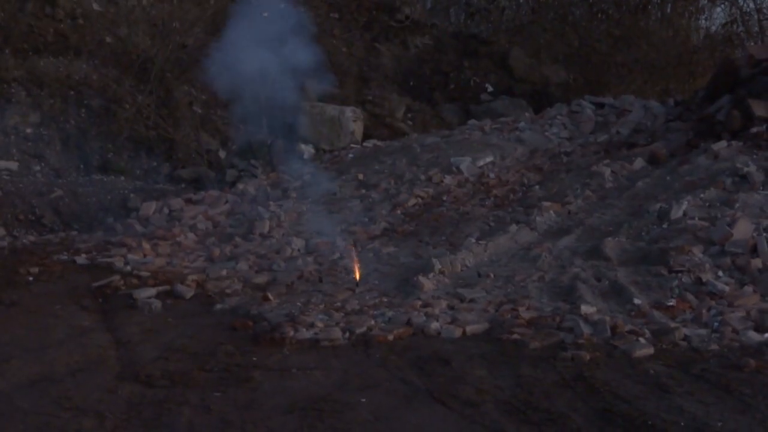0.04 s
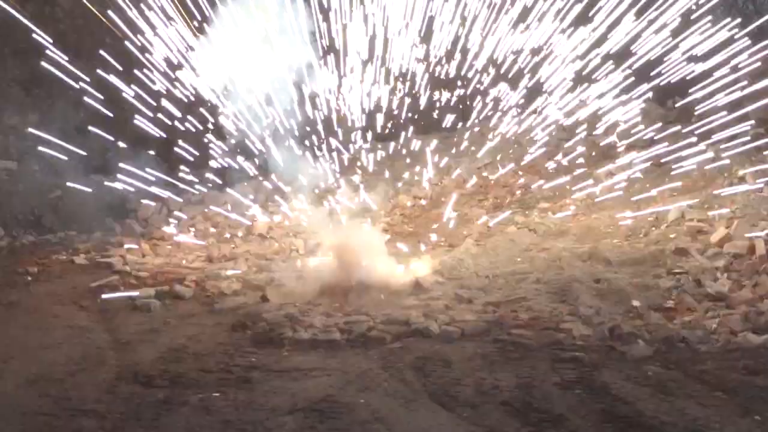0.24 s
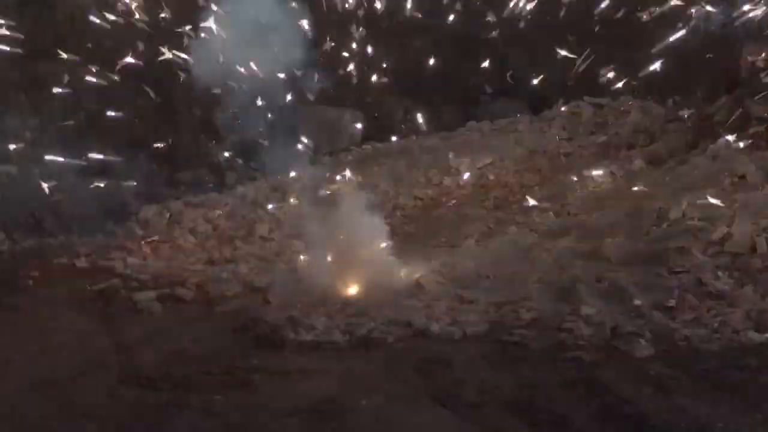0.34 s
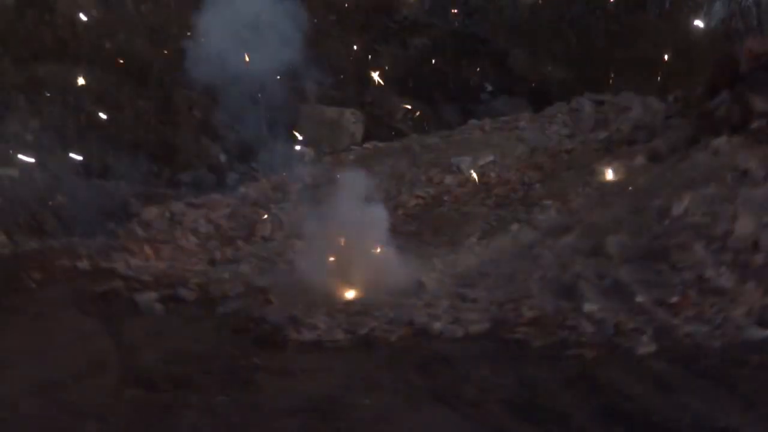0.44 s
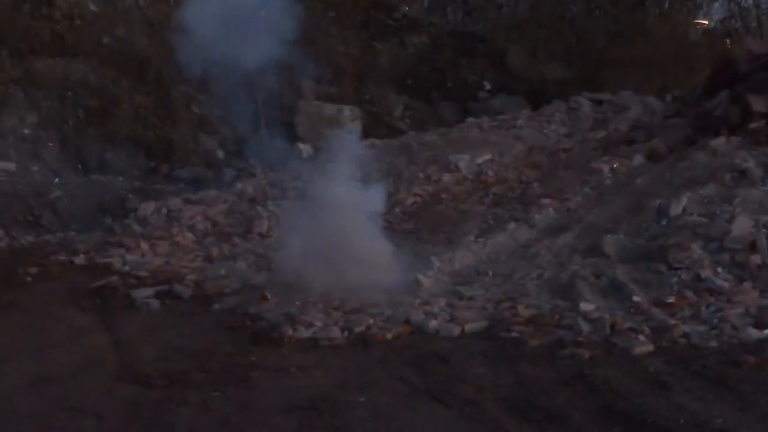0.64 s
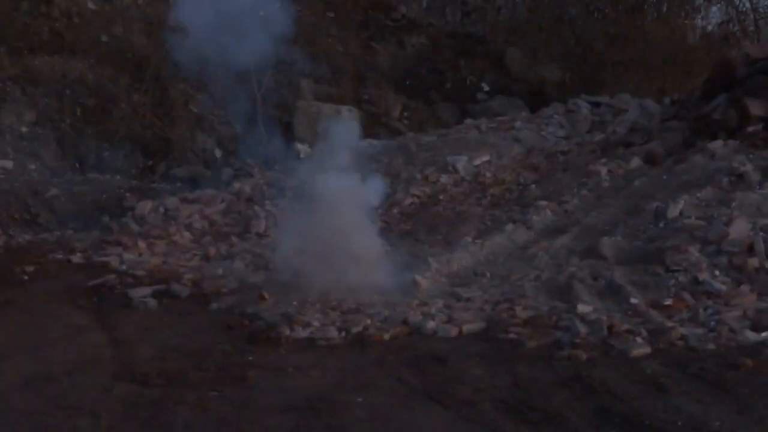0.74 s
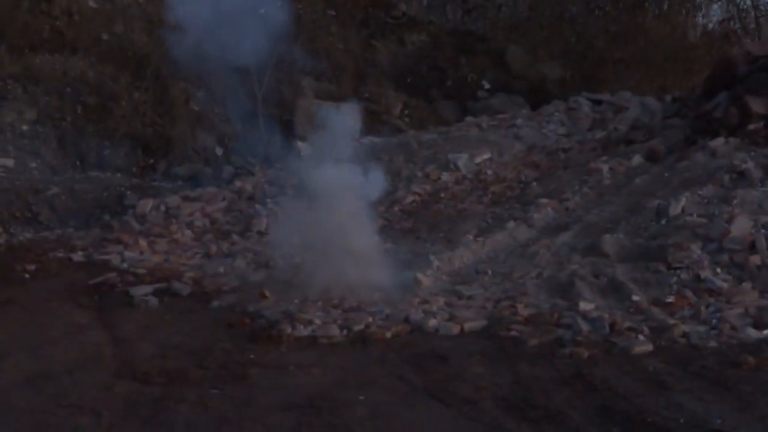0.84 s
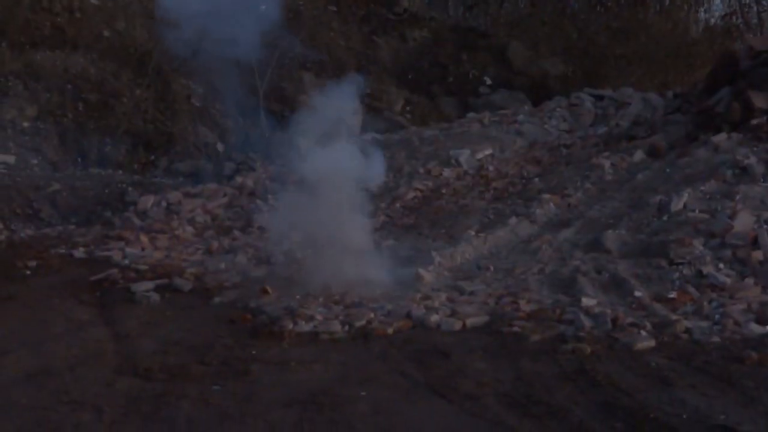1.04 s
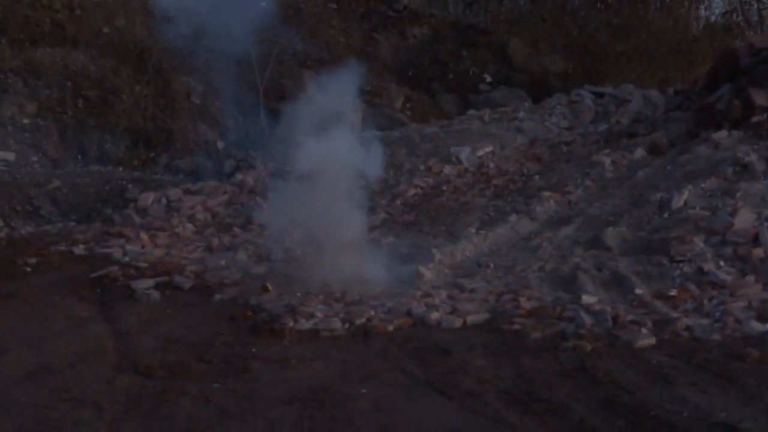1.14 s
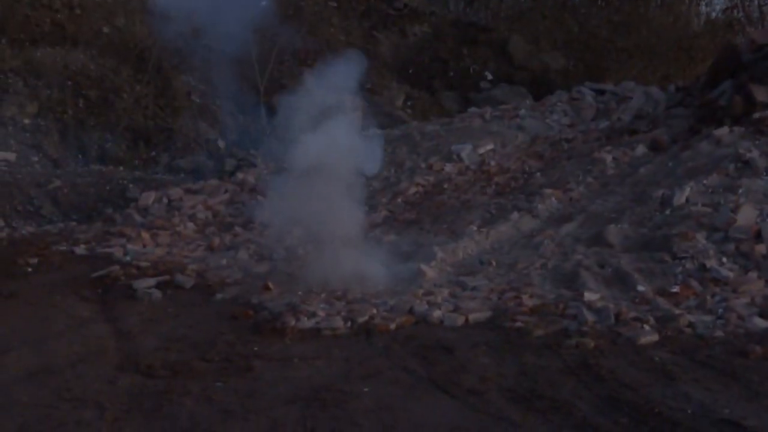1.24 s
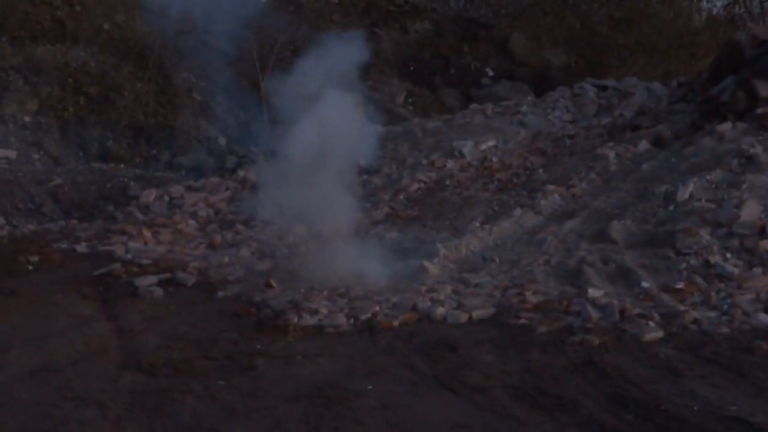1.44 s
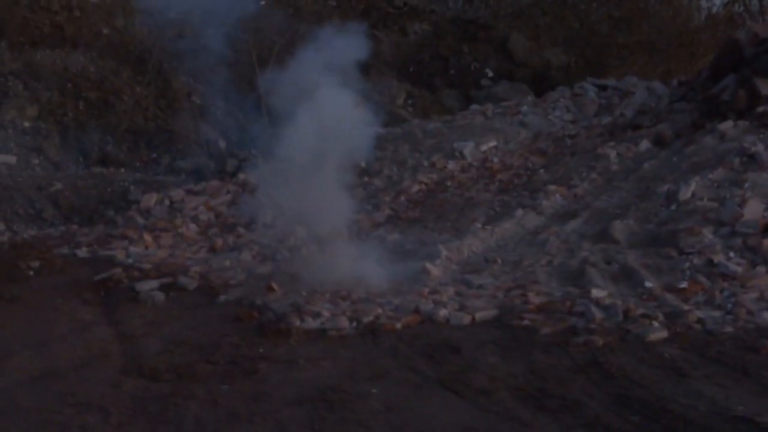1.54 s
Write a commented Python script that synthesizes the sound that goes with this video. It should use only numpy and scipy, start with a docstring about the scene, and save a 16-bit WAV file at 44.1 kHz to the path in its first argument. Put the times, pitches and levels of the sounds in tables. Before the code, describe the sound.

Brief thin fuse hiss, then a single hard firework blast distorting the microphone outdoors; bright hiss and dense hillside echoes follow, dry spark clicks snap nearby, and the darkening roll dies to faint background air.

```python
"""A fuse hisses, then one overloading bang: a firework on a heap of rubble, as overlapping noise cracks and hiss.
Rubble slopes and far hillsides send it back as a darkening roll of coloured noise, with single slaps
and low pushes made of short wavelets. Thrown sparks crackle near the microphone as filtered clicks.
Outdoor murmur and microphone hiss, both steady coloured noise, lie under it all."""
import sys
import numpy as np
from scipy import signal
from scipy.fft import rfft, irfft, next_fast_len
from scipy.io import wavfile
from scipy.ndimage import map_coordinates

SR = 44100
rng = np.random.default_rng(int(sys.argv[2]) if len(sys.argv) > 2 else 0)


def store_wav(level_fs):
    """Save 16-bit WAV to argv[1]."""
    pcm = np.round(np.clip(np.atleast_2d(level_fs), -1, 1) * 32767)
    wavfile.write(sys.argv[1], SR, pcm.T.astype(np.int16))


N = 70560
BANG_S = .2283


def amp(db):
    """dB to gain."""
    return 10 ** (np.asarray(db) / 20)


def unit(x):
    """Scale to rms 1."""
    return x / np.sqrt(np.mean(x ** 2) + 1e-20)


def along(points, hz):
    """Interpolate (Hz, value) points on a log axis; the first and last values hold beyond their frequencies."""
    point_hz, value = np.transpose(points)
    return np.interp(np.log(hz + 1), np.log(point_hz + 1), value)


def curves(rows):
    """One value per sample for each column after the time."""
    s, *columns = np.transpose(rows)
    return [np.interp(np.arange(N) / SR, s, column) for column in columns]


def wobble(knots_per_s):
    """A smooth random curve through normally distributed knots."""
    knots = rng.standard_normal(int(N * knots_per_s / SR) + 4)
    return map_coordinates(knots, [np.arange(N) * knots_per_s / SR])


def filtered(x, response):
    """Multiply the spectrum of x by a response of frequency."""
    size = next_fast_len(N + SR // 2)
    hz = np.fft.rfftfreq(size, 1 / SR)
    return irfft(rfft(x, size) * response(hz), size)[..., :N]


def rush(spectrum):
    """Stereo noise of rms 1; the mid-to-side balance sets how alike the channels are in each band."""
    # left-right correlation: freq_hz, likeness (0 to 1)
    likeness = [(60, 0.98), (180, 0.99), (550, 0.94), (1650, 0.88), (4970, 0.95), (15000, 1)]

    def mid_side_gains(hz):
        turn_rad = np.arccos(np.clip(along(likeness, hz), -1, 1)) / 2
        return amp(along(spectrum, hz)) * [np.cos(turn_rad), np.sin(turn_rad)]

    mid, side = filtered(rng.standard_normal((2, N)), mid_side_gains)
    return unit(np.array([mid + side, mid - side]))


def travelled(spectrum):
    """Noise whose bands fade with travel time in air, the treble fastest."""
    # change of colour with travel: freq_hz, loss_db_per_s
    air_loss = [(60, 16), (400, -2), (1500, 0.5), (3000, 9), (6000, 28), (14000, 72.5)]
    given_colour_at_s = .5
    hz, t_s, bins = signal.stft(rush(spectrum), SR, nperseg=1024)
    loss_db = along(air_loss, hz)[:, None] * (t_s - given_colour_at_s)
    return signal.istft(bins * amp(-loss_db), SR, nperseg=1024)[1][:, :N]


def add(out, s, sound, pan_db=0):
    """Place a sound at a time, with its left-over-right level."""
    part = out[:, round(s * SR):][:, :len(sound)]
    part += amp([[pan_db / 2], [-pan_db / 2]]) * sound[:part.shape[1]]


def wavelet(hz, cycles):
    """A short swing that rises fast and dies in a few cycles; the envelope peaks after the given cycles."""
    u = np.arange(SR // 10) / SR * hz / cycles
    return u * np.exp(1 - u) * np.sin(2 * np.pi * cycles * u)


def after_bang():
    return np.arange(N) / SR > BANG_S


def blast():
    """Cracks are noise bursts dying 60 dB in 3.9 ms; the overloaded blast adds bright hiss, held, then fading."""
    # three overlapping cracks of the bang: start_s, level_db (gain on unit noise at onset)
    cracks = [(0.2278, -1.5), (0.2322, 2.5), (0.2312, -2.5)]
    # bright hiss of the overloaded blast: time_s, level_db (relative)
    blast_hiss = [(.228, -12), (.236, -20), (.3, -17), (.37, -15.5), (.41, -17.5), (.47, -33), (.55, -31),
                  (.65, -35.5), (.77, -50), (.9, -58)]
    # blast hiss spectrum: freq_hz, density_db_per_hz (relative)
    blast_hiss_colour = [(1180, -34), (2000, -9), (2670, 9), (6150, 0), (6720, -1), (12400, -6),
                         (15500, -23.5), (16300, -43)]
    level_db, = curves(blast_hiss)
    out = travelled(blast_hiss_colour) * amp(level_db - 5.5 + 2.2 * wobble(300)) * after_bang()
    t_s = np.arange(SR // 100) / SR
    for s, db in cracks:
        add(out, s, amp(db - 60 * t_s / 0.0039) * rng.standard_normal(len(t_s)))
    return out


def roll():
    """Overlapping echoes as low noise, under finer scatter off loose stones and trees."""
    # roll of echoes: time_s, level_db (relative), left_over_right_db
    echoes = [(.232, -7.5, 1.5), (.276, -12, 2), (.39, -15.5, -2), (.488, -11, -3), (.5, -20, -3),
              (.534, -13, 1), (.56, -19.5, 1), (.67, -20, .5), (.7, -26, .5), (.735, -27, 2),
              (.75, -30, 0.5), (.797, -29.5, 3), (.802, -22.5, 1), (.85, -22, 2), (.865, -23.5, 1.5),
              (.934, -30.5, 2), (1.03, -33, 0.5), (1.1, -37, 0.5), (1.25, -41, 0.5), (1.4, -45.5, 0),
              (1.59, -44, -1)]
    # roll spectrum: freq_hz, density_db_per_hz (relative)
    echo_colour = [(15, -63), (25, -25), (205, -5), (461, -1.5), (702, -7.5), (790, -7.5), (934, -9.5),
                   (1400, -16.5), (1820, -46), (3080, -120)]
    # finer scatter: time_s, level_db (relative)
    scatter = [(.232, -22), (.314, -16), (.4, -16.5), (.488, -17.5), (.55, -22.5), (.708, -31.5),
               (.796, -38), (.802, -29.5), (.9, -35), (1.05, -43), (1.268, -51), (1.59, -57.5)]
    # scatter spectrum: freq_hz, density_db_per_hz (relative)
    scatter_colour = [(530, -31.5), (900, -3.5), (1320, -2), (1720, -2.5), (1880, -3.5), (4680, -12),
                      (12100, -33), (16000, -50.5)]
    level_db, pan_db = curves(echoes)
    fine_db, = curves(scatter)
    # flat floors: above 2200 Hz in the low part, below 600 Hz in the fine part
    low = travelled(list(echo_colour) + [(2200, -43)]) * amp(level_db + 1.2 * wobble(90))
    fine = travelled([(600, -36.5)] + list(scatter_colour)) * amp(fine_db + 1.5 + 0.5 * wobble(150))
    return (low + fine) * amp(np.outer([.5, -.5], pan_db)) * after_bang()


def slaps():
    """Rock faces return single dull copies of the bang as wavelets, with low pushes under them."""
    # slaps from rock faces: start_s, level_db (relative), left_over_right_db, pitch_hz
    faces = [(0.229, 3, -0.5, 409), (0.237, -9, 5.5, 415), (0.251, -7.5, 3, 414), (0.265, -2.5, -5.5, 410),
             (0.342, -1, -6.5, 530), (0.421, -1, -8, 410), (0.444, -4, 3, 226), (0.459, -0.5, 1, 315),
             (0.473, -11, -19, 396), (0.482, 3, -3, 395), (0.503, -2.5, -2.5, 221),
             (0.521, -6.5, -7.5, 460), (0.534, -1.5, 2, 207), (0.588, -10, 4.5, 355),
             (0.609, -5.5, -3.5, 345), (0.631, -5, 2.5, 330), (0.656, -2, 2, 453), (0.669, -7, 2, 316),
             (0.723, -5.5, 1, 387), (0.8, -7.5, 0, 625), (0.825, -5.5, 4, 580), (0.861, -8.5, -1, 443),
             (0.874, -9, 0, 370), (0.889, -9.5, 1.5, 535), (0.911, -17.5, 0, 493), (1.019, -30, 0.5, 436),
             (1.32, -28.5, 0.5, 422.5), (1.468, -24, 1.5, 390), (1.564, -28.5, 7.5, 405)]
    # low pushes: start_s, level_db (relative), pitch_hz
    thumps = [(.232, -9, 140), (0.284, -25, 93), (0.328, -15, 110), (.44, -38, 85.5), (0.577, -23.5, 85),
              (0.667, -23.5, 102), (0.801, -19.5, 102), (0.832, -26, 75), (0.909, -32, 76.5),
              (1.024, -40.5, 69.5)]
    out = np.zeros((2, N))
    for s, db, pan_db, hz in faces:
        add(out, s, amp(db - 5.05) * wavelet(hz, cycles=.85), pan_db)
    for s, db, hz in thumps:
        add(out, s, amp(db + 1.5) * wavelet(hz, cycles=0.53))
    return out


def small_sparks():
    """Fainter snaps at random times, growing weaker: start_s, level_db, bounce_ms, bounce_db."""
    from_s, to_s = .5, 1.08
    lowest_start_db, fade_db_per_s = -33.5, 29.5
    rows = []
    for late, size, high in rng.random((45, 3)):
        after_s = late * (to_s - from_s)
        level_db = lowest_start_db + 9 * size - fade_db_per_s * after_s
        rows.append((from_s + after_s, level_db, 2 + 2.5 * high, -8))
    return rows


def sparks():
    """Each snap is a sharp click, its weaker ground bounce and a short scatter off stones and slopes."""
    # near snaps: start_s, level_db (before colour), bounce_delay_ms, bounce_db (re click)
    near = [(.589, -27.5, 3.2, -8), (.613, -28, 2.9, -7), (.6172, -27, 2.1, -7.5), (.6405, -23.5, 2.8, -2),
            (.6545, -29, 3.2, -9), (.6615, -26, 3.2, -9), (.671, -28, 1.6, -3), (.6775, -26.5, 3.2, -9),
            (.689, -25.5, 2.8, -6.5), (.6985, -22.5, 2.2, -6), (.7198, -23.5, 3, -9.5),
            (.7268, -26, 2, -4.5), (.7378, -21.5, 2.8, -9), (.748, -30.5, 4, -6), (.7895, -30.5, 2, -3.5),
            (.799, -26, 4, -6), (.8123, -17.5, 3.4, -7), (.825, -16, 4.6, -6), (.865, -21.5, 3.6, -9),
            (.8717, -24, 3.6, -5.5), (.884, -21, 3.6, -10), (.8988, -18.5, 2.6, -4.5),
            (.9042, -23, 2.5, -8.5), (.923, -22.5, 3, -12), (.9508, -12.5, 2.5, -4.5),
            (.9599, -18, 2.8, -8), (1.0227, -15.5, 3.6, -6.5), (1.1345, -47.5, 3, -8), (1.1695, -47, 3, -6),
            (1.2244, -26, 3, -7), (1.2725, -45, 3, -8)]
    # snap spectrum: freq_hz, gain_db
    colour = [(400, -12), (1500, 11), (3000, 11), (6000, 3), (9000, 3.5), (12000, 6), (14500, 1),
              (16000, -17.5)]
    stones_db, stones_t60_s = -33, .03
    slopes_db, slopes_t60_s = -40, 0.28
    clicks = np.zeros(N)
    for s, db, bounce_ms, bounce_db in list(near) + small_sparks():
        clicks[round(s * SR)] -= amp(db)
        clicks[round((s + bounce_ms / 1000) * SR)] -= amp(db + bounce_db)
    t_s = np.arange(SR // 4) / SR
    decay = amp(stones_db - 60 * t_s / stones_t60_s) + amp(slopes_db - 60 * t_s / slopes_t60_s)
    tail = decay * rush([(20, 0)])[:, :len(t_s)]
    snaps = clicks + signal.fftconvolve(clicks[None], tail, axes=1)[:, :N]

    def response(hz):
        phase_rad = -np.arctan(np.log((hz + 1) / 9000))
        return amp(along(colour, hz)) * np.exp(1j * phase_rad)

    return filtered(snaps, response)


def fuse():
    """The burning fuse is unsteady hissing noise, cut off at the bang."""
    # fuse spectrum: freq_hz, density_db_per_hz (relative)
    colour = [(880, -61), (1500, -31.5), (2300, -34), (2560, -11), (2800, -14.5), (3450, -3), (4370, -7),
              (4970, -15), (7840, -17.5), (8570, -19), (11800, -9.5), (14300, -21), (16000, -29)]
    level_db = -54 + 0.76 * wobble(90)
    return amp(level_db) * rush([(1200, -82)] + list(colour)) * ~after_bang()  # flat floor below 1200 Hz


def background():
    """Far outdoor murmur wavers slightly; microphone hiss stays level."""
    # outdoor murmur spectrum: freq_hz, density_db_per_hz (relative)
    air_colour = [(12, -40), (20, -9), (43, 6), (177, 5), (268, -6), (439, -6), (589, -5.5), (908, -4.5),
                  (2200, -20), (2860, -59.5), (4840, -120)]
    # microphone hiss spectrum: freq_hz, density_db_per_hz (relative)
    hiss_colour = [(2940, -37.5), (5000, -12), (9190, 1), (13000, 3), (14900, -1.5), (16000, -12.5)]
    # flat floors: murmur above 4000 Hz, hiss below 3000 Hz
    air = amp(-49.5 + 0.5 * wobble(7.1)) * rush(list(air_colour) + [(4000, -66)])
    hiss = amp(-80) * rush([(3000, -33.5)] + list(hiss_colour))
    return air + hiss


def scene():
    """Sum of all sources."""
    return blast() + roll() + slaps() + sparks() + fuse() + background()


def record(dry):
    """The input overloads softly at full scale; deep bass is thinned and nothing passes the band limit."""
    full_scale = .95
    low_cut_hz, top_hz, skirt_hz = 40, 16200, 500
    clipped = dry / (1 + np.abs(dry / full_scale) ** 5) ** (1 / 5)

    def response(hz):
        high_pass = 1j * hz / (low_cut_hz + 1j * hz)
        band_limit = np.sin(np.pi / 2 * np.clip((top_hz - hz) / skirt_hz, 0, 1)) ** 2
        return high_pass * band_limit

    return filtered(clipped, response)


dry = scene()
out = record(dry)
store_wav(out)
```